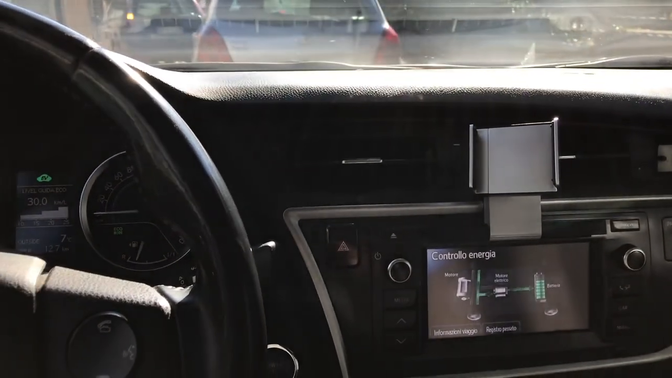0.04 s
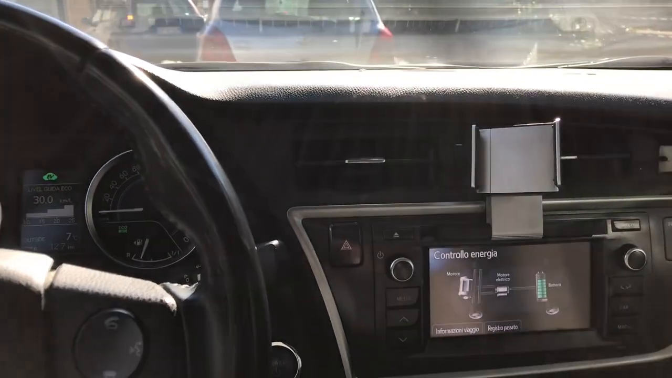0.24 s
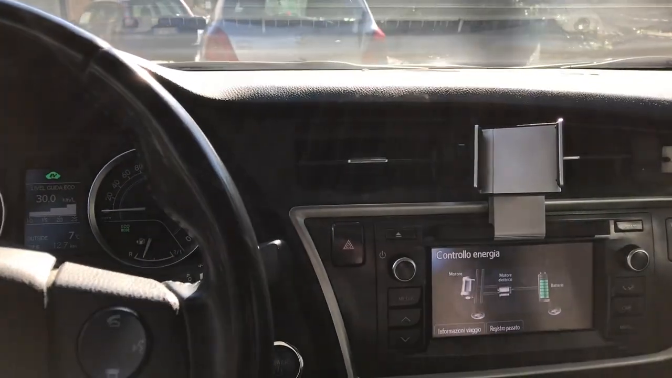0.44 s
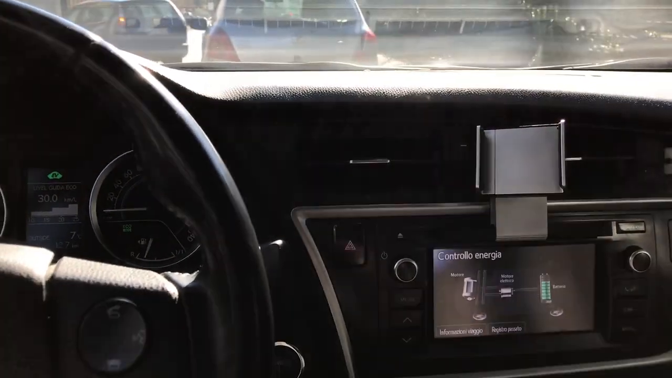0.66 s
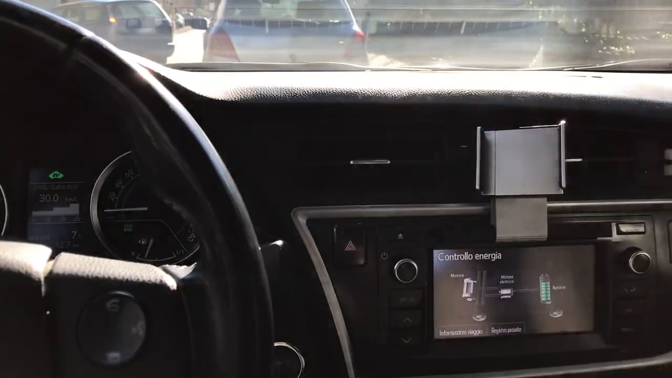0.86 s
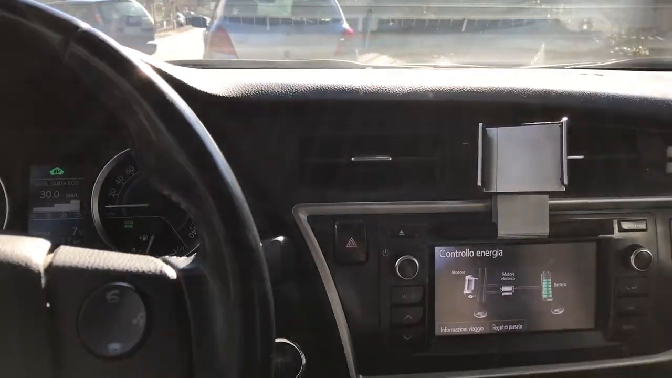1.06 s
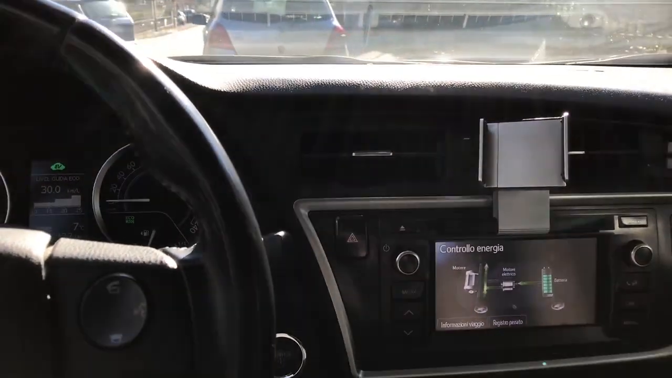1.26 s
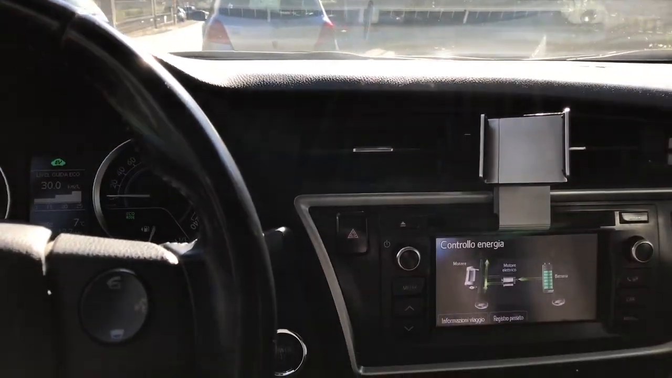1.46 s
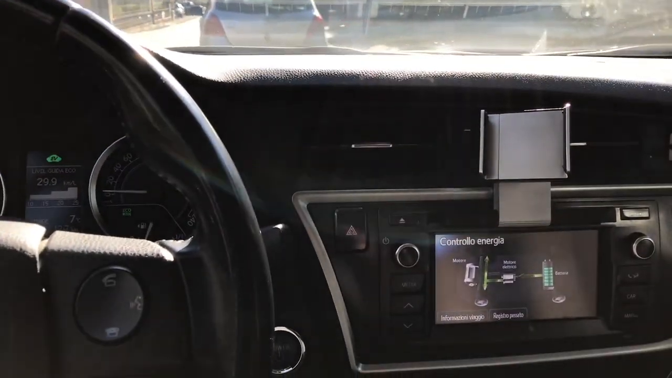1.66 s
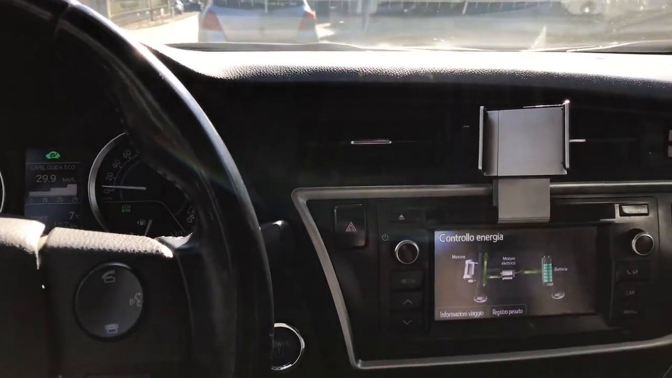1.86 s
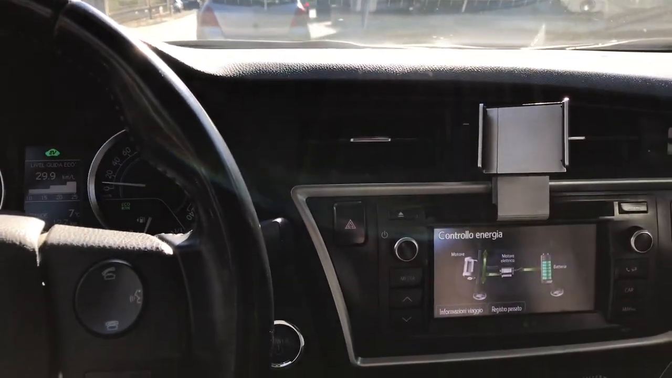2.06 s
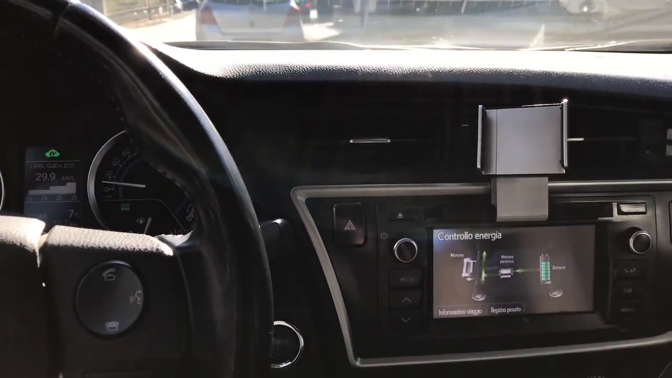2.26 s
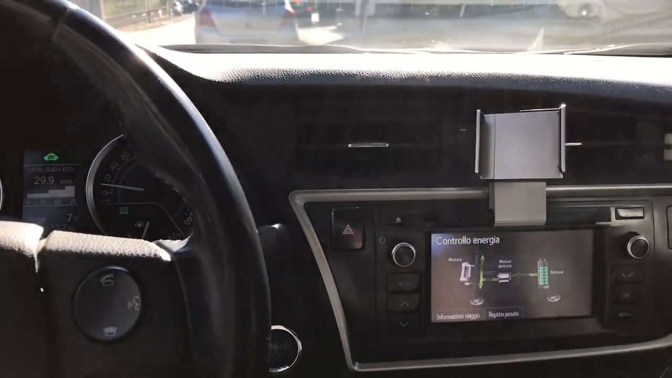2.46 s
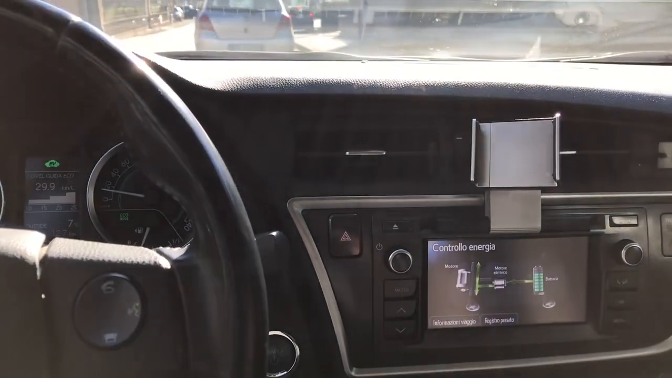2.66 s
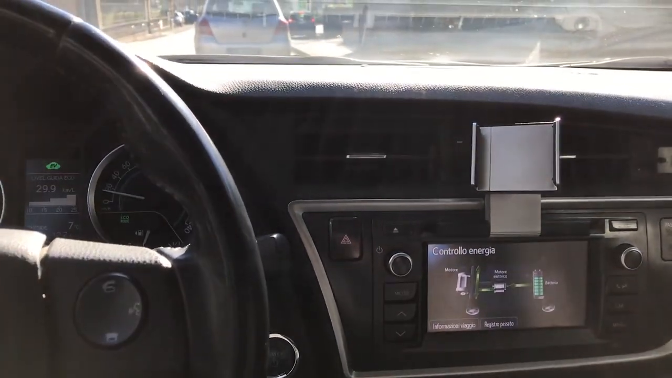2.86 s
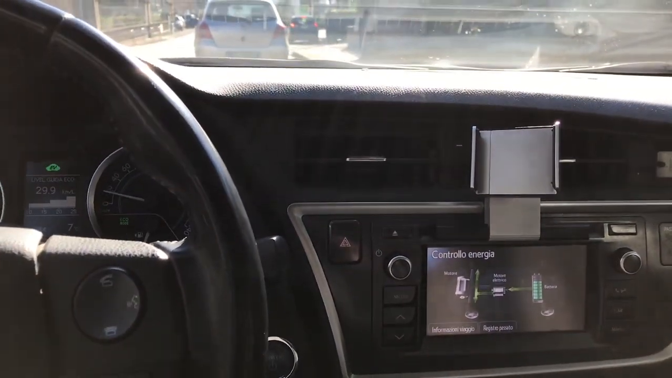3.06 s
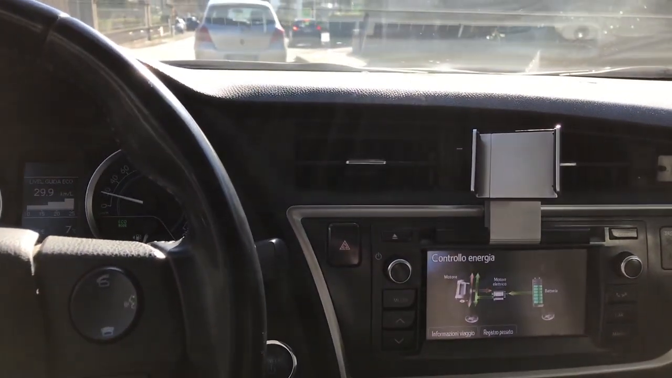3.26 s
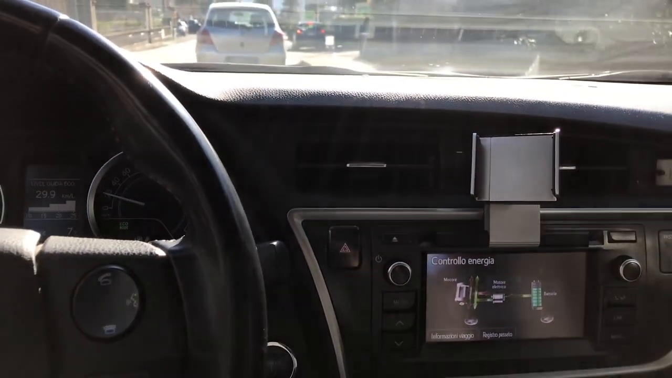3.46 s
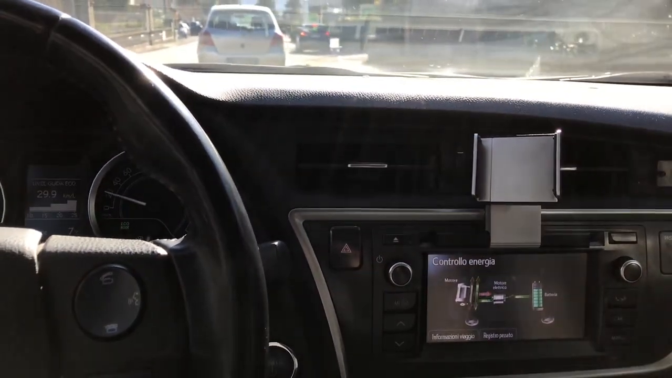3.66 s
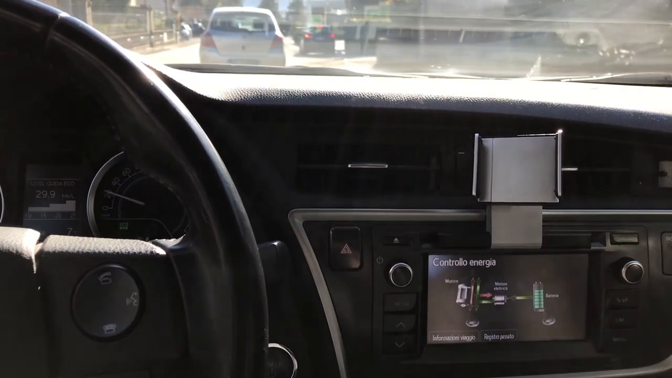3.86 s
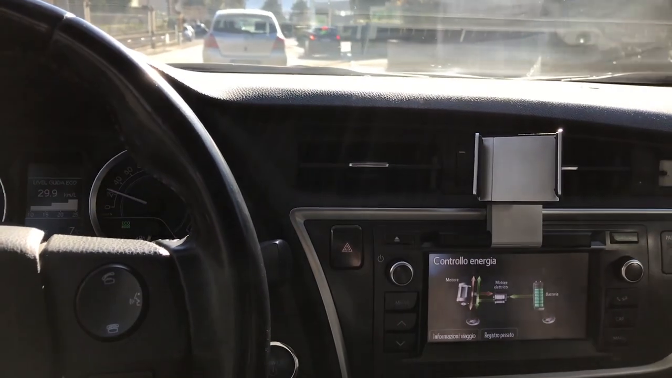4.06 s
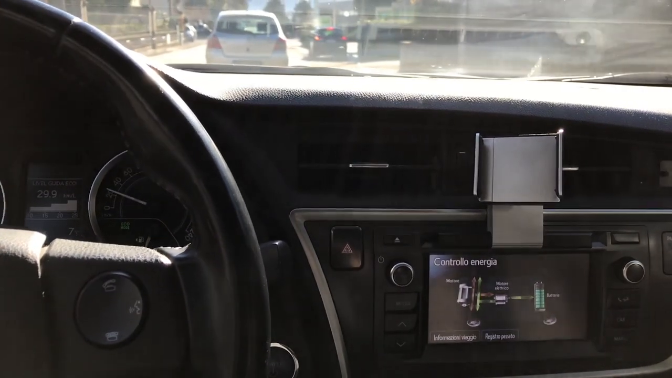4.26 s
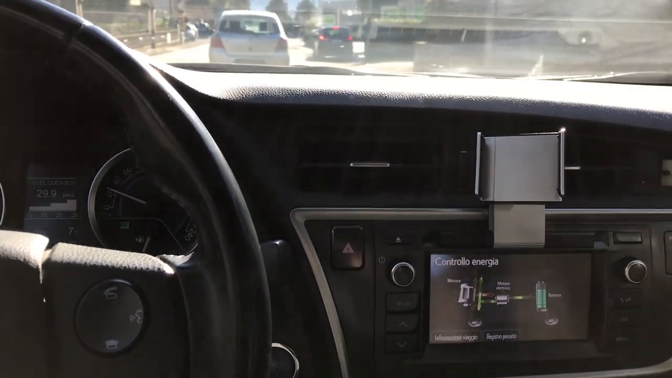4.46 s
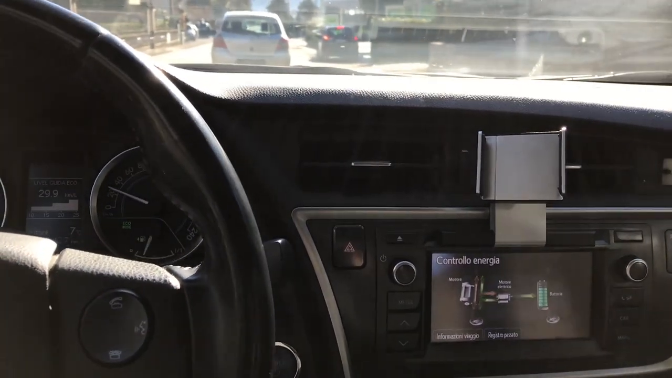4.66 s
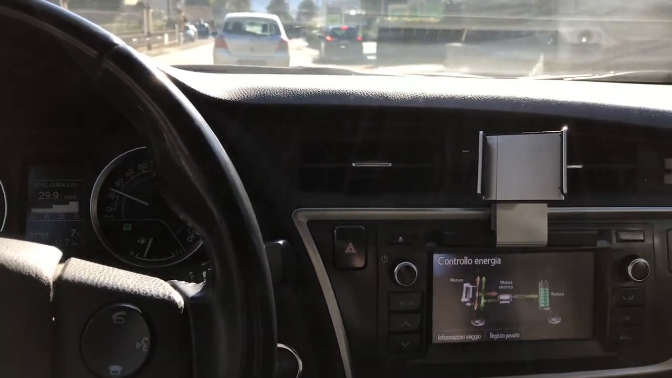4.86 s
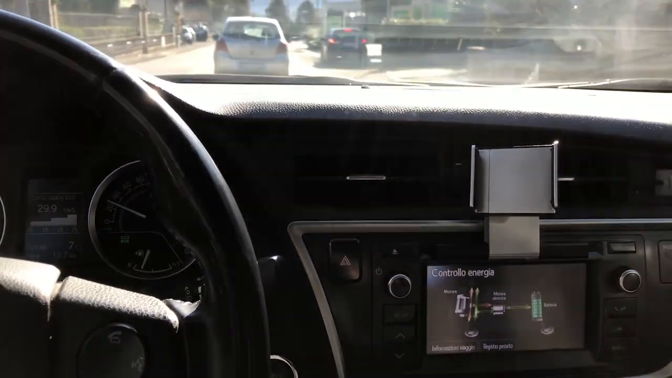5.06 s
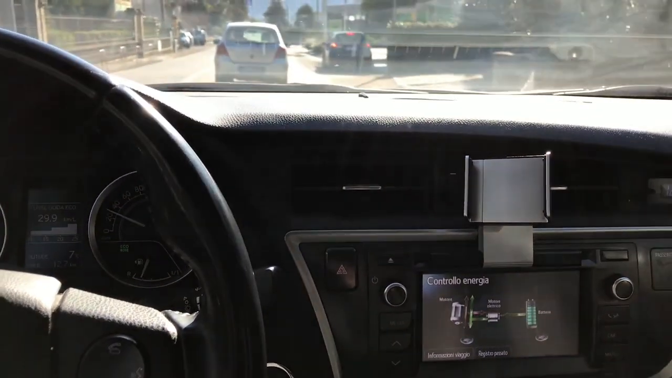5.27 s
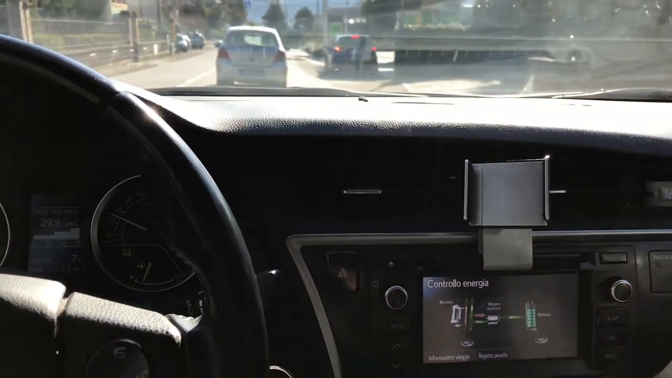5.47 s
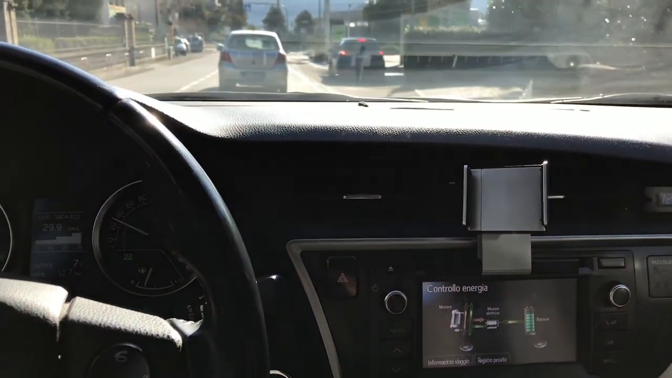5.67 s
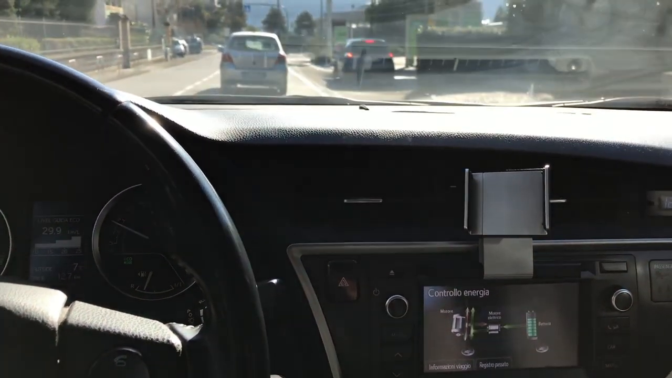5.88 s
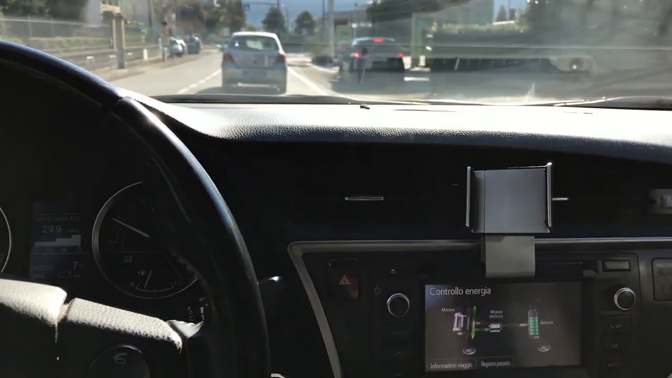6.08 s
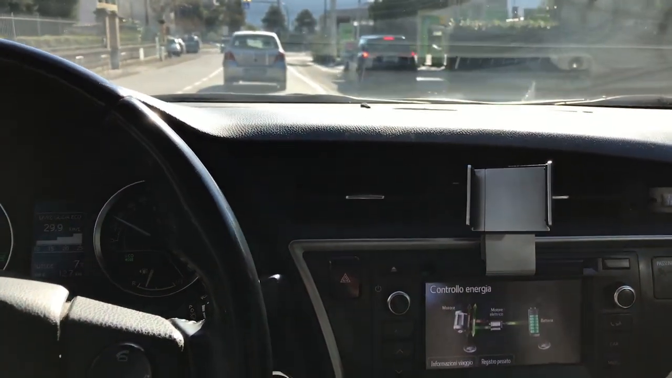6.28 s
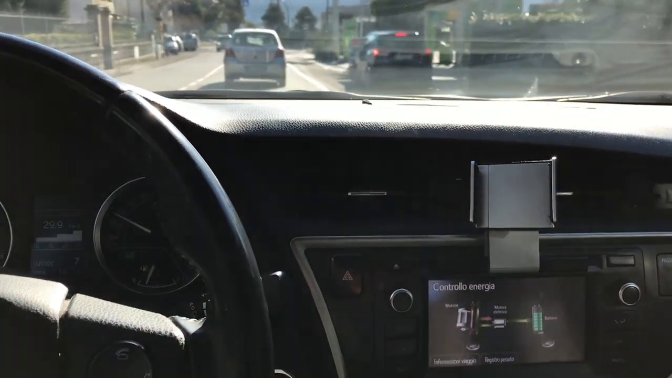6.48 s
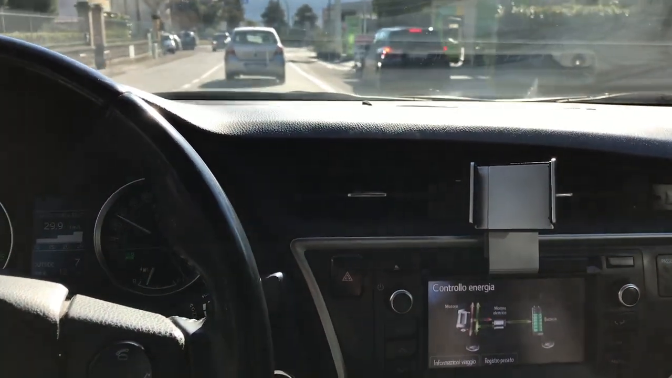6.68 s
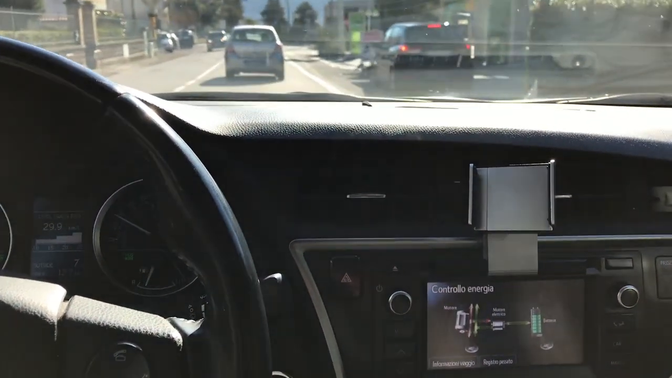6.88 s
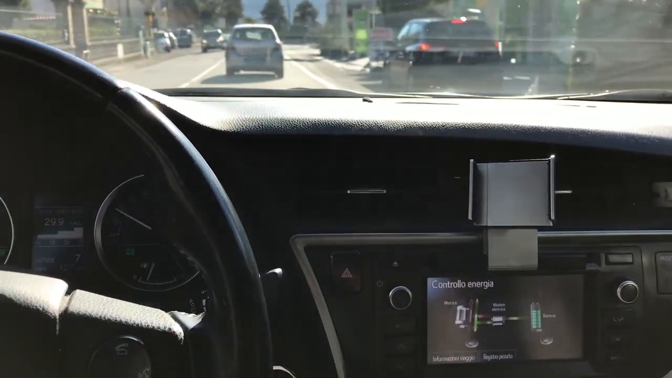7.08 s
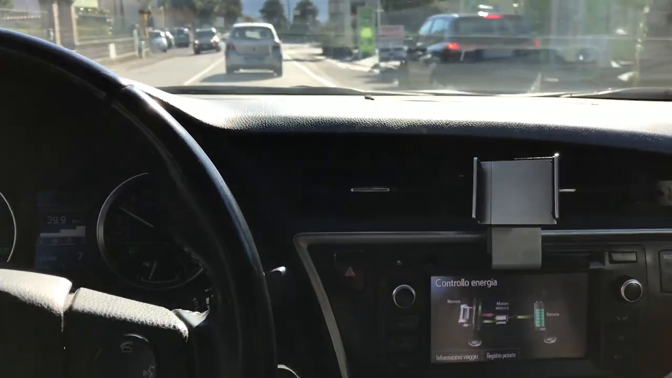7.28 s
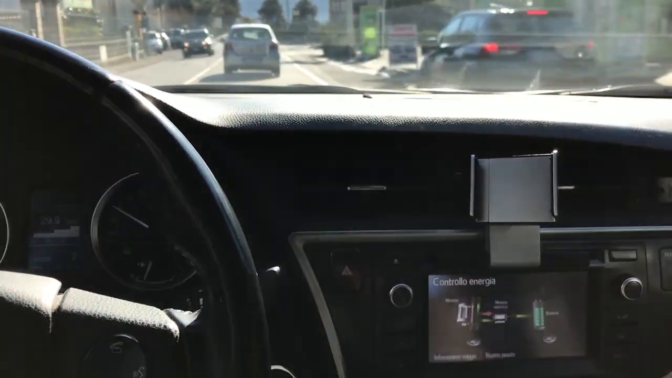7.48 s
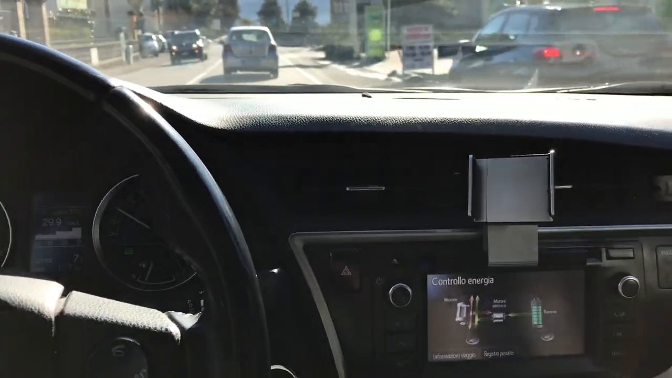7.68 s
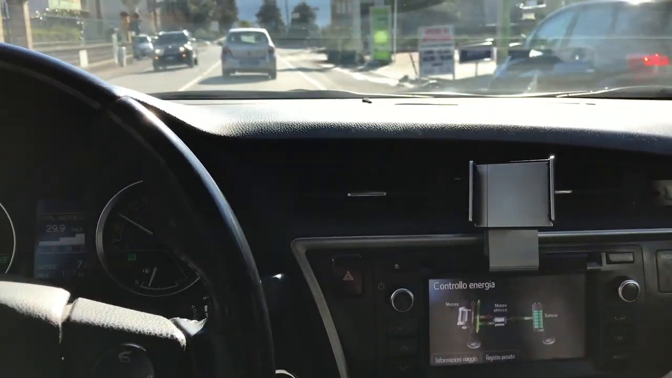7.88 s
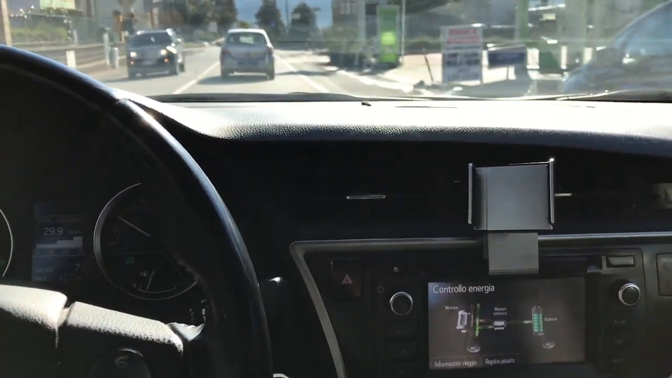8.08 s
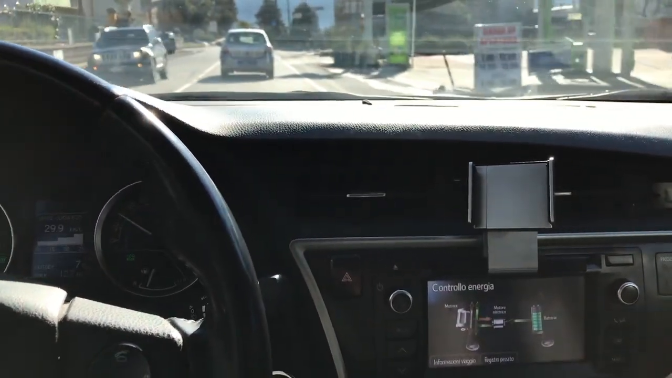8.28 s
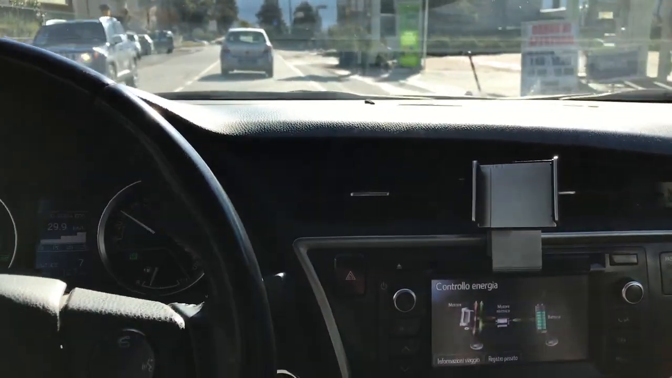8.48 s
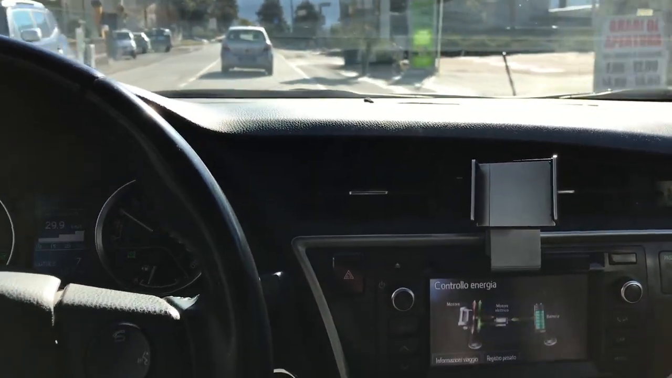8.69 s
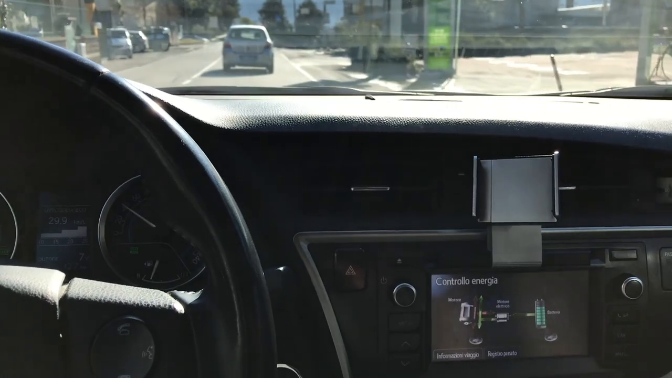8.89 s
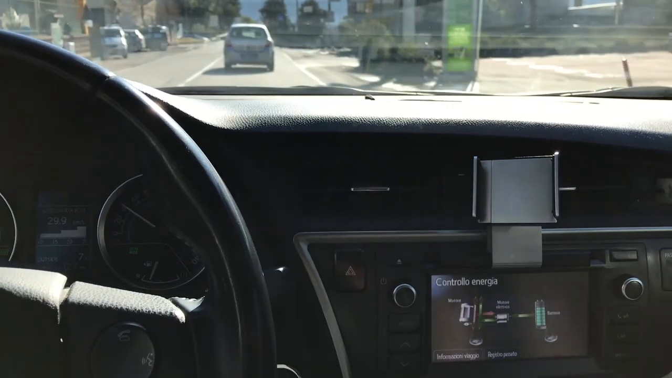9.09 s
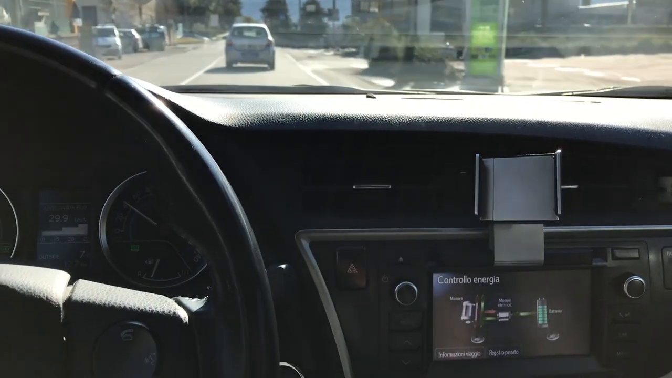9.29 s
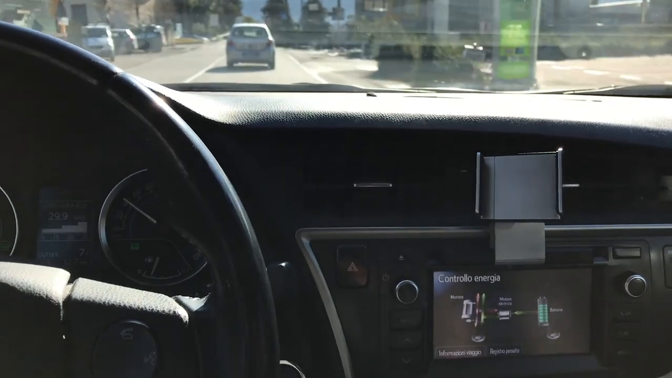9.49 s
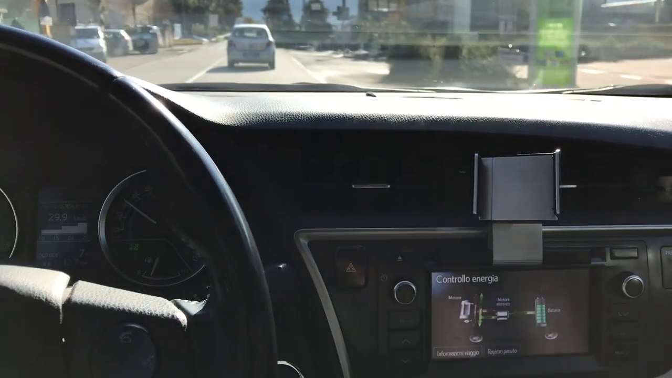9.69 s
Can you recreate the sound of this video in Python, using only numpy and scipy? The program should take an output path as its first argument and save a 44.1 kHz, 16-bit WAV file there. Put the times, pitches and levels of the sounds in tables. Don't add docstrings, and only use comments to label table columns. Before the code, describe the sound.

Low cabin rumble swells as a car accelerates gently, with small trim ticks, one sharp clack, and dull suspension thumps over faint hiss.

```python
import sys
import numpy as np
from scipy import signal
from scipy.io import wavfile
from scipy.ndimage import uniform_filter1d

SR = 44100
rng = np.random.default_rng(int(sys.argv[2]) if len(sys.argv) > 2 else 0)


def master(y):
    cut = np.clip(np.atleast_2d(y).T, -1, 1)
    pcm = np.round(cut * 32767)
    wavfile.write(sys.argv[1], SR, pcm.astype(np.int16))


def natural_amplitude(level_db):
    exponent = np.asarray(level_db, float) / 20
    return 10 ** exponent


N = 429534

# (time [s], road speed as motor whine [Hz], motor torque [dB], unevenness of the road [dB])
DRIVE = [(0, 39.5, -45, -3), (1.0, 110.3, -30, 2), (1.3, 147.4, -0.5, -7), (1.57, 190, 3, 5),
         (2.0, 279.2, -3, 1.5), (2.45, 356.2, 1, 6), (2.75, 414.5, -1.5, 0), (3.1, 469, -1, -1.5),
         (3.6, 536, -9, 0), (4.3, 609, -11, -13), (4.75, 650, 1, 2.5), (5.07, 683, -6, -7),
         (5.6, 728, 0, -5), (6.1, 771, -1, -4.5), (6.45, 790, -23, 2), (7.15, 870, -40, -1),
         (7.9, 899.2, -40, 5.5), (9.74, 990, -40, 0)]


def rms_one(x):
    return x / np.sqrt(np.mean(x ** 2) + 1e-20)


def in_time(rows):
    s, *columns = np.transpose(rows)
    t = np.arange(N) / SR
    fade_s = 0.05
    gate = np.clip(np.minimum(t - s[0], s[-1] + fade_s - t) / fade_s, 0, 1)
    return [np.interp(t, s, c) for c in columns] + [gate]


def drift(rate):
    r = np.exp(-80 * np.pi * rate / SR)
    white = rng.standard_normal(N // 40 + 2002)
    slow = signal.lfilter([1], [1, -2 * r, r * r], white)[2000:]
    return np.interp(np.arange(N) / 40, np.arange(len(slow)), rms_one(slow))


def resonances(x, modes):
    out = 0
    for k, (hz, width_hz, level_db) in enumerate(modes):
        r = np.exp(-np.pi * width_hz / SR)
        poles = [1, -2 * r * np.cos(2 * np.pi * hz / SR), r * r]
        ringing = signal.lfilter([(1 - r * r) / 2, 0, (r * r - 1) / 2], poles, x)
        out = out + (-1) ** k * natural_amplitude(level_db) * ringing
    return out


def humming(white, mode):
    return natural_amplitude(mode[2]) * rms_one(resonances(resonances(white, [mode]), [mode]))


def bands(white, low_hz, count, step):
    edges = low_hz * 2 ** (step * np.arange(count + 1))
    for k, (low, high) in enumerate(zip(edges, edges[1:])):
        sos = signal.butter(2, [low, high], "band", fs=SR, output="sos")
        run_in = np.r_[white[k % 2, -SR // 2:], white[k % 2]]
        yield np.sqrt(low * high), signal.sosfilt(sos, run_in)[-N:]


def at_hz(points, hz):
    points_hz, points_db = np.transpose(points)
    return np.interp(np.log(hz), np.log(points_hz), points_db)


def tone(hz, levels_db, multiples, wobble, flutter_db):
    phase = 2 * np.pi * np.cumsum(hz * (1 + wobble * drift(5.9))) / SR
    out = 0
    for k, (multiple, db) in enumerate(zip(multiples, levels_db)):
        gain = natural_amplitude(uniform_filter1d(db, size=1500) + flutter_db * drift(3.1))
        out = out + np.sqrt(2) * gain * np.sin(multiple * phase + k)
    return out


def motor():
    # (frequency [Hz], width [Hz], level [dB])
    body_paths = [(71.5, 8.2, -32.5), (298, 18, -48), (331.5, 16.7, -57), (384.3, 17, -59),
                  (460, 37, -66.5), (558, 110, -64), (655, 70, -68.5), (760, 110, -69.5)]
    # (multiple of the whine [1], level [dB])
    orders = [(.1715, 0), (1.0, 0.5), (1.999, -7)]
    hz, torque_db, *_ = in_time(DRIVE)
    levels_db = []
    for multiple, order_db in orders:
        power = 0
        for mode_hz, width_hz, db in body_paths:
            detuning = 2 * (multiple * hz - mode_hz) / width_hz
            power = power + natural_amplitude(2 * db) / (1 + (detuning ** 2) ** 2)
        levels_db.append(10 * np.log10(power) + order_db + torque_db)
    return tone(hz, levels_db, [m for m, _ in orders], wobble=0.004, flutter_db=1.2)


def engine():
    # (time [s], firing rate [Hz], firing level [dB], load [0-1])
    firing = [(3.55, 44.96, -38, 0), (3.65, 45.93, -35, 0.14), (3.82, 50.15, -33, 0.6),
              (4.25, 48.19, -28, 0.81), (4.5, 45.13, -31, 0.95), (4.65, 42.7, -40, 0.56),
              (4.77, 42.96, -30.5, 0.95), (5.17, 46.25, -28.5, 0.99), (5.8, 46.74, -31.5, 0.85),
              (6.08, 47.76, -29.5, 0.79), (6.24, 44.92, -26.5, 1), (6.36, 41.75, -36.5, 0.06),
              (6.6, 39.91, -35, 0), (7.2, 40.06, -35, 0), (8.05, 40.6, -33.5, .3), (8.41, 41.6, -41.5, 1),
              (8.88, 43.57, -32.5, 0.98), (9.74, 44.5, -27, 1)]
    # (multiple of the firing rate [1], level coasting [dB], level at full load [dB])
    harmonics = [(2, -42, -55.5), (3, -50, -37.5), (5, -65.5, -57), (6, -60, -56)]
    hz, firing_db, load, gate = in_time(firing)
    multiples, levels_db = [1], [firing_db]
    for multiple, coast_db, full_db in harmonics:
        multiples.append(round(multiple))
        levels_db.append(coast_db + (full_db - coast_db) * load)
    return gate * tone(hz, levels_db, multiples, wobble=0.003, flutter_db=0.7)


def gearbox_shafts():
    # (time [s], shaft rate [Hz], level [dB])
    start_glide = [
        (2.7, 35.14, -46),
        (2.952, 42.8, -38),
        (3.348, 52.1, -28.5),
        (3.55, 58.7, -52),
        (3.766, 65.4, -36),
        (4.002, 68.36, -41.5),
        (4.3, 58, -36.5),
        (4.45, 48.2, -27.5),
        (4.55, 47.5, -38),
    ]
    # (time [s], shaft rate [Hz], level [dB])
    cruise_glide = [
        (6.9, 54.7, -40),
        (7.24, 60.8, -42.5),
        (7.57, 64.67, -43),
        (7.85, 69.3, -37),
        (8.41, 78.6, -39.5),
        (8.55, 82.57, -50),
        (9.03, 85.8, -46),
        (9.19, 76.7, -38),
        (9.66, 68.33, -41),
    ]
    out = 0
    for glide in (start_glide, cruise_glide):
        hz, db, gate = in_time(glide)
        out = out + gate * tone(hz, [db], [1], wobble=0.0107, flutter_db=2.0)
    return out


def road_parts():
    # (level at rest [dB], level at speed [dB], knee of the whine [Hz],
    # fall per halving below it [dB], share of unevenness [1])
    speed_laws = [(-47.5, -35.5, 195, 16.5, 0.87), (-56.5, -42, 330, 16, 0.055),
                  (-63, -47, 640, 24.5, 0.056), (-69.5, -56, 950, 17, .01)]
    # (middle [s], length [s], rumble level [dB], drone level [dB], hiss level [dB])
    passing = [
        (0.176, 0.45, -53.5, -57, -63.5),
        (1.45, .3, -62, -65, -74),
        (2.498, 0.76, -43, -71, -82),
        (3.2, 0.62, -37.5, -70, -82),
        (3.85, 0.73, -44, -59, -66.5),
        (4.398, .4, -43, -53.5, -72),
        (6.4, 1.1, -47.5, -52, -75),
        (7.4, .5, -41, -54, -73),
        (8.9, 0.95, -49, -77, -58),
    ]
    hz, _, uneven_db, _ = in_time(DRIVE)
    t = np.arange(N) / SR
    powers = []
    for rest_db, top_db, knee_hz, rise_db, share in speed_laws:
        below_knee_db = rise_db * np.log2(1 + (knee_hz / hz) ** 4) / 4
        powers.append(natural_amplitude(2 * rest_db) + natural_amplitude(2 * (top_db - below_knee_db + share * uneven_db)))
    for s, length, *levels_db in passing:
        near = np.exp(-(2 * (t - s) / length) ** 2)
        powers[1:] = [power + near * natural_amplitude(2 * db) for power, db in zip(powers[1:], levels_db)]
    return 10 * np.log10(powers)


def road(patchy_db):
    centres_hz = [50, 125, 350, 1200]
    # (frequency [Hz], density [dB per Hz])
    body_colour = [(25, -10.5), (38, -7), (52, 1), (75, -4.5), (125, 3.5), (180, 1), (260, 1.5), (380, -4),
                   (560, -6.5), (900, -3), (1300, -1), (2200, -12.5), (4000, -28), (6000, -79)]
    # (frequency [Hz], width [Hz], level over its road part [dB], road part [0-3])
    tyre_modes = [(52.44, 8.4, -9.5, -0.5), (215.45, 6.9, -13.5, 1), (277, 32, -14.5, 2),
                  (377.5, 45, -1, 3)]
    parts_db = road_parts()
    white, texture, out = rng.standard_normal((2, N)), drift(6.8), 0
    for hz, band in bands(white, 22.5, count=24, step=1 / 3):
        place = np.interp(np.log(hz), np.log(centres_hz), range(4))
        k = min(int(place), 2)
        lower_db, upper_db = [parts_db[j] - 10 * np.log10(centres_hz[j]) for j in (k, k + 1)]
        level_db = lower_db * (k + 1 - place) + upper_db * (place - k) + at_hz(body_colour, hz)
        flicker_db = patchy_db * (0.41 * texture + drift(2.3))
        out = out + natural_amplitude(level_db + flicker_db) * band * np.sqrt(SR / 2)
    for *mode, part in tyre_modes:
        out = out + natural_amplitude(parts_db[round(part)]) * humming(white[0], mode)
    return out


def thumps():
    # (time [s], level [dB], frequency [Hz], decay t60 [s])
    pushes = [(.05, -36, 49.5, 0.33), (.17, -35, 51.3, 0.61), (0.224, -38, 128.5, 0.31),
              (0.32, -32, 49.8, 0.32), (0.68, -40, 55, .2), (0.831, -33, 54.6, 0.25), (.915, -38, 183, 0.1),
              (.92, -38, 135.4, 0.18), (0.923, -37, 85.5, 0.13), (1.022, -38, 48.7, 0.48),
              (1.308, -37.5, 196, 0.076), (1.479, -38.5, 262, 0.049), (1.522, -35, 53, .35),
              (2.07, -28, 98.7, .4), (4.318, -27.5, 56.8, .35), (7.382, -21, 57.2, 0.5),
              (7.69, -21.5, 68.4, 0.28), (8.49, -20, 45, 0.56), (8.705, -20, 44.5, 0.6)]
    out, t = np.zeros(N), np.arange(round(0.4 * SR)) / SR
    soft_onset = 1 - np.exp(-t / 0.0072)
    for s, db, hz, t60 in pushes:
        i = round(s * SR)
        out[i:i + len(t)] += natural_amplitude(db - 60 * t / t60) * soft_onset * np.sin(2 * np.pi * hz * t)
    return out


def latch():
    # (time [s], thud level [dB], ring level [dB])
    contacts = [
        (1.471, -72, -50),
        (1.4792, -28.5, -29.5),
        (1.4815, -30, -35.5),
        (1.487, -30, -55),
        (1.495, -37.5, -30),
        (1.506, -39, -36),
        (1.517, -48, -43),
        (1.524, -38, -58),
    ]
    # (frequency [Hz], level [dB], decay t60 [s])
    housing = [(338, -13, 0.045), (459, -5.5, 0.057), (620, -10, .035), (814, 1, 0.091), (906, 4.5, 0.02)]
    # (frequency [Hz], width [Hz], level [dB])
    spring = [(1790, 410, 1.5), (2670, 420, -1.5), (3396, 110, 4.5), (4410, 140, 0), (5350, 630, -7),
              (6650, 2700, -11), (8400, 2500, -12.5), (13300, 2700, -18)]
    t = np.arange(1500) / SR
    first_s = contacts[0][0]
    knocks, grinding = np.full((2, 6000), 1e-18)
    for (s, thud_db, ring_db), grit in zip(contacts, rng.standard_normal((len(contacts), len(t)))):
        i = round((s - first_s) * SR)
        knocks[i:i + len(t)] += natural_amplitude(thud_db - 24.5) * (1 + 0.34 * grit) * natural_amplitude(-60 * t / 0.0012)
        grinding[i:i + len(t)] += natural_amplitude(ring_db + 2.0) * grit * natural_amplitude(-60 * t / 0.048)
    clack = resonances(grinding, spring)
    for hz, level_db, t60 in housing:
        r, w = natural_amplitude(-60 / (t60 * SR)), 2 * np.pi * hz / SR
        clack += natural_amplitude(level_db) * signal.lfilter([0, np.sin(w)], [1, -2 * r * np.cos(w), r * r], knocks)
    out = np.zeros(N)
    out[round(first_s * SR):][:len(clack)] = clack
    return out


def ticks():
    # (frequency [Hz], width [Hz], level [dB])
    plastic = [
        [(1420, 1120, -10.5), (2000, 920, 1.5), (2410, 600, 1.5), (2980, 350, -2)],
        [(3600, 1350, 15.5), (4530, 2360, 6.5)],
        [(6280, 860, 5.5), (8800, 1000, 3.5)],
        [(11500, 2300, -1), (14200, 1800, -8)],
    ]
    # (time [s], peak level [dB], extra per range upwards [dB])
    panel = [(.2234, -71, -2), (.843, -50.5, 1.5), (0.999, -52, 0.5), (1.1686, -52.5, 1),
             (1.232, -63, -0.5), (1.375, -53.5, 1), (1.5443, -55, -1.5), (1.7652, -55, -2.5),
             (1.794, -62.5, 1.5), (2.8994, -71, 1), (7.3619, -57.5, -1)]
    clip = [(1.6838, -38, 1.5), (4.292, -59, -1), (7.4394, -62, 3), (7.6842, -46, -4), (7.7477, -53.5, -2),
            (7.97, -61, -5), (8.08, -62, 2), (8.56, -52, -6), (8.6491, -59, 5), (9.4892, -49.5, -6),
            (9.7193, -50, -7)]
    seam = [(0.4923, -59, 0.5), (0.6085, -62, 1), (.6403, -62.5, 2.5), (.6708, -58, 0.5), (.7023, -59, -1),
            (.7506, -61, 0), (.7801, -63, 1), (1.613, -57, -0.5), (2.4186, -63, -0.5), (7.6996, -55, -3.5),
            (8.98, -57.5, 3)]
    foil = [
        (.2683, -59, -2),
        (.3071, -57.5, -1),
        (.3716, -64, 0),
        (8.79, -54.5, 0.097),
        (8.925, -68, 0),
    ]
    # (under 3 kHz [dB], 3-6 kHz [dB], 6-10 kHz [dB], over 10 kHz [dB], decay t60 [s])
    colours = [(0, 1, -2.5, -9, 0.068), (-1, -10.5, -25, -37, 0.038), (-6, -7.5, -2, -12, 0.062),
               (-5, -13, 1, 0.5, 0.049)]
    out, t = np.zeros(N), np.arange(3000) / SR
    for table, (*colour_db, t60) in zip((panel, clip, seam, foil), colours):
        decay = natural_amplitude(-60 * t / 0.0065) + natural_amplitude(-60 * t / max(t60, 0.005))
        for (s, db, tilt_db), noise in zip(table, rng.standard_normal((len(table), len(t)))):
            burst = 3.1 * (t == 0) + noise * decay
            i = round(s * SR)
            for k, modes in enumerate(plastic):
                wide_modes = [(hz, 3 * width_hz, 0) for hz, width_hz, _ in modes]
                part = resonances(resonances(burst, modes), wide_modes)
                gain = natural_amplitude(db + colour_db[k] + k * tilt_db + 0.5)
                out[i:i + len(t)] += (gain * part / np.abs(part).max())[:N - i]
    return out


def scuffs():
    # (middle [s], length [s], level [dB])
    rubs = [(.45, 1, -74), (1.102, 0.62, -77), (2.907, 0.089, -73), (4.65, 0.044, -61.5),
            (4.703, 0.036, -63), (4.719, 0.057, -51.5), (4.756, 0.033, -68), (5.196, 0.06, -59.5),
            (7.439, 0.064, -72), (7.69, 0.061, -68), (9.0, 0.31, -77)]
    # (frequency [Hz], width [Hz], level [dB])
    cloth = [(1040, 270, 2.5), (1440, 58, 12), (1980, 580, 2), (3474, 1550, 0), (6400, 2400, -6),
             (11000, 5000, -28)]
    t = np.arange(N) / SR
    rub = sum(natural_amplitude(db) * np.exp(-((t - s) / (length / 2.32)) ** 2) for s, length, db in rubs)
    white = rng.standard_normal(N)
    uneven_db = 2.6 * np.minimum(rng.exponential(1, N), 5)
    grains = white * natural_amplitude(uneven_db + 2.8 * drift(150))
    return rub * rms_one(resonances(grains, cloth))


def vent():
    # (frequency [Hz], width [Hz], level [dB])
    narrow_bands = [(382, 30, -83.5), (800, 180, -78.5), (935, 227, -70), (3900, 60, -97.5), (4460, 260, -88.5),
                    (6010, 280, -89.5), (8400, 330, -96)]
    white = rng.standard_normal(N)
    return sum(humming(white, mode) for mode in narrow_bands)


def microphone_floor():
    # (frequency [Hz], density [dB per Hz])
    hiss_colour = [(880, -19.5), (1500, -18.5), (2510, 0), (3880, 0.5), (4200, -1), (4500, -13.5),
                   (4780, -3.5), (5940, -4), (7540, -7), (8660, -3), (10500, -9), (12600, -4), (14300, -12),
                   (15200, -7), (16000, -2)]
    # (frequency [Hz], level [dB])
    whistles = [(3790, -97), (6702, -101), (8430, -101), (15003, -91)]
    hiss_db, comb_hz, comb_db, comb_fall_db = -77, 996.4, -92, -0.9
    white = rng.standard_normal((2, N))
    hiss = sum(natural_amplitude(at_hz(hiss_colour, hz)) * band for hz, band in bands(white, 1400, count=22, step=1 / 6))
    lines = [(k * comb_hz, comb_db + k * comb_fall_db) for k in range(4, 16)] + list(whistles)
    t = np.arange(N) / SR
    hum = sum(np.sqrt(2) * natural_amplitude(db) * np.sin(2 * np.pi * hz * t + hz) for hz, db in lines)
    return natural_amplitude(hiss_db + 2.5) * rms_one(hiss) + hum


def scene():
    drive = motor() + engine() + gearbox_shafts()
    cabin = thumps() + latch() + ticks() + scuffs() + vent()
    return (drive + road(patchy_db=1.43) + cabin + microphone_floor())[None]


def top_cut(x):
    return signal.sosfilt(signal.butter(12, 16490, fs=SR, output="sos"), x)


def record(dry):
    low_pass = signal.ellip(10, 0.5, 45, 15720, fs=SR, output="sos")
    return top_cut(signal.sosfilt(low_pass, dry))


dry = scene()
out = record(dry)
master(out)
```